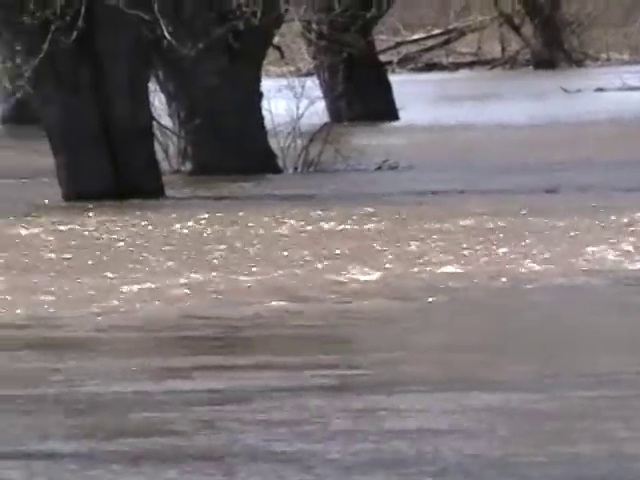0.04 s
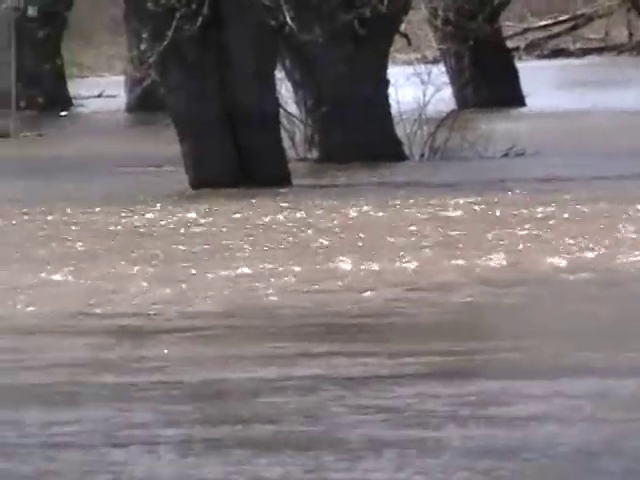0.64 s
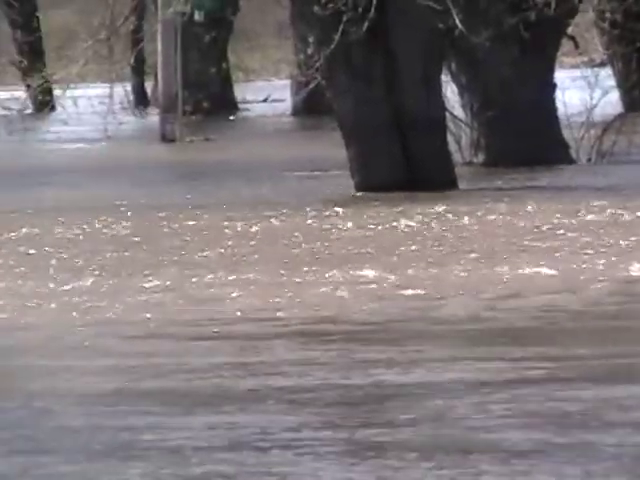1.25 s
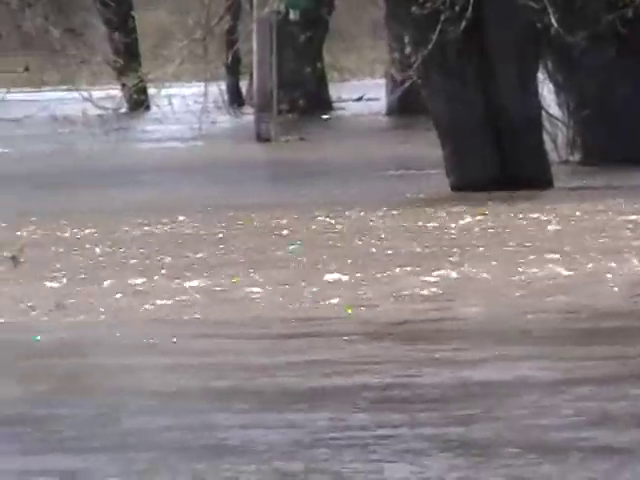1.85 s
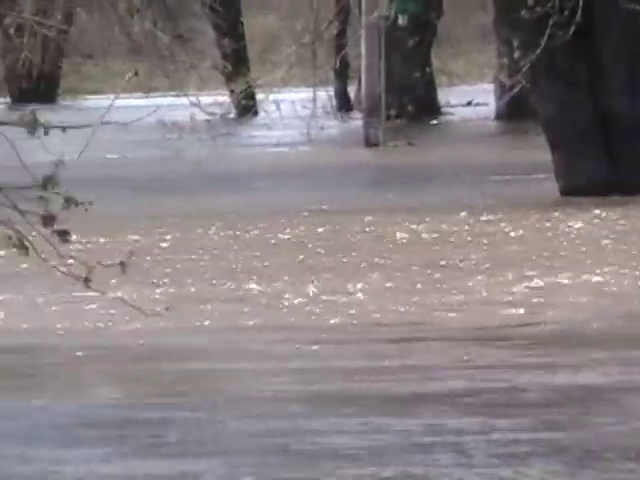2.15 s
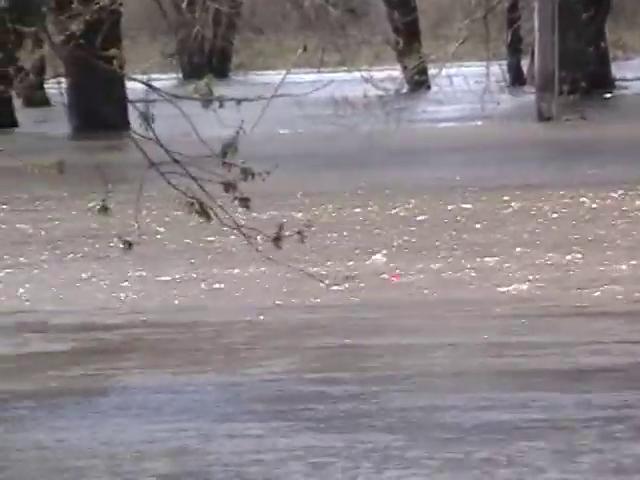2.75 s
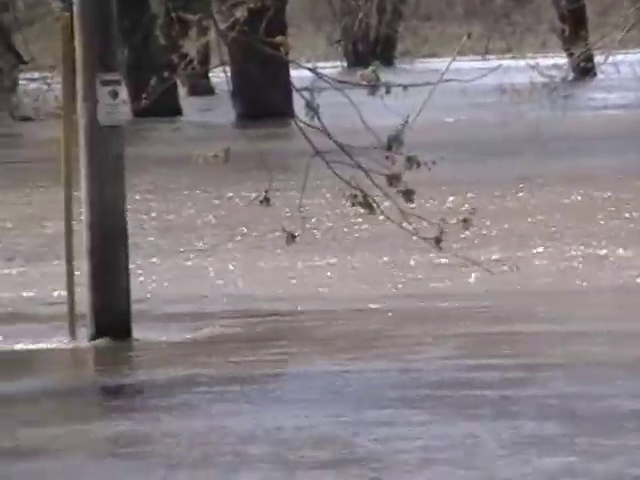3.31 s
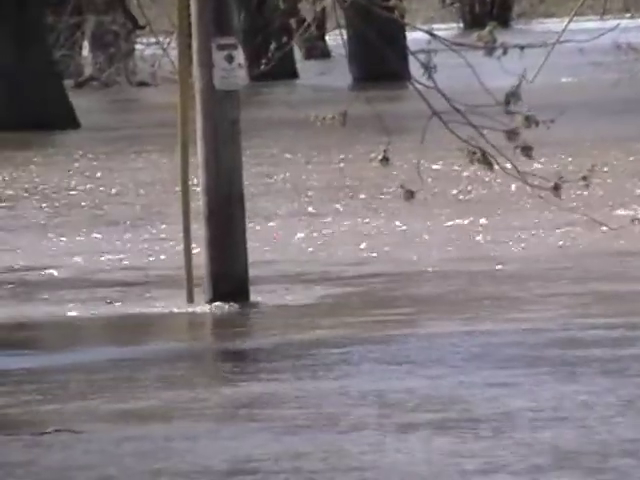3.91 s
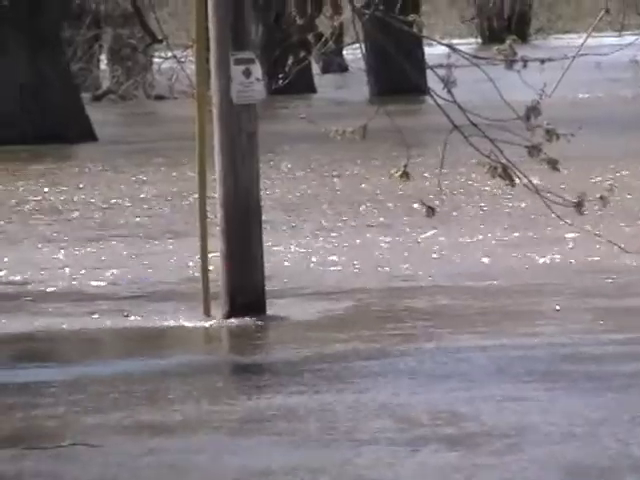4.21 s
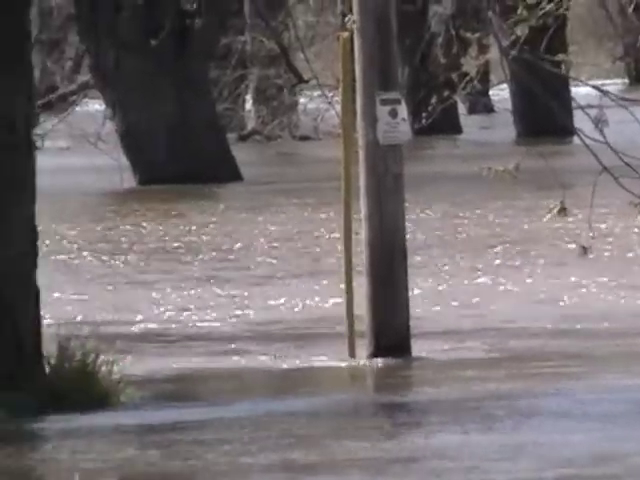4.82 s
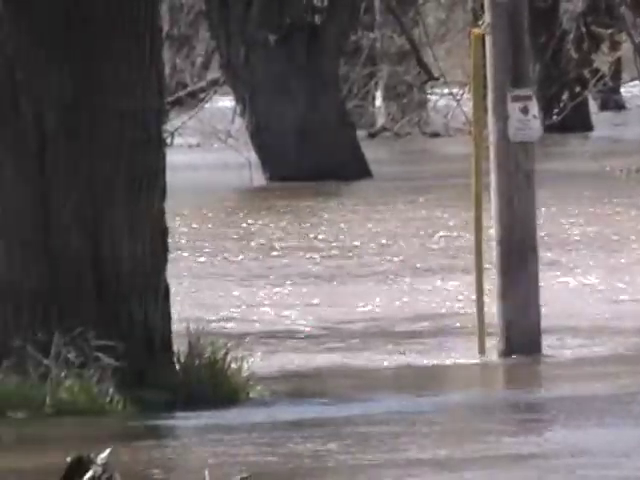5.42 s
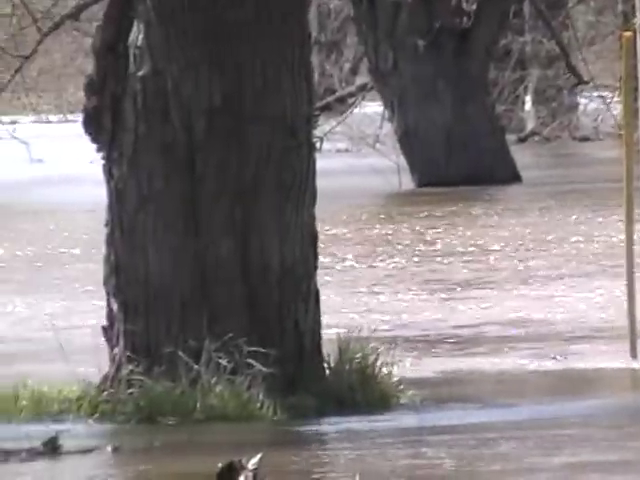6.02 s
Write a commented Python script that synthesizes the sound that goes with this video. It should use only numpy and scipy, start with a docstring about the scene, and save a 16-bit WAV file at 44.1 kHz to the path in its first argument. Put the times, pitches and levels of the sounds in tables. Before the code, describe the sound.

Floodwater rushes steadily beside a wood for the whole six seconds, with a very faint, thin camera whine underneath. From the start, gusts buffet the microphone with a loud low rumble, thumps and tiny ticks, hardest around 0.4 to 0.7 seconds. At about 0.9 seconds a woodpecker begins a fast vocal trill of short, arched notes, roughly nine a second. It starts soft and reedy, swells by 1.7 seconds, then turns slightly hoarse and stops near 3.6 seconds, echoing among the trunks. The wind gradually eases, with weaker gusts around 3 to 3.5 and 4.5 to 5 seconds. Faint sparrow chirps come at about 2.5, 3.7, 4.5, 5.1 and 5.7 seconds. Farther off, a thin high trill starts near 3.9 seconds and a run of dry chips near 4.8, both lasting to the end. One small dry snap sounds close by at 5.5 seconds.

```python
"""Beside a flooded wood, on a faintly whining camera's microphone, the river rushing steadily throughout.
Gusts buffet the microphone from the start, thumping and ticking. Just under a second in, a woodpecker
begins a fast trill of arched notes, echoed by the trunks, and holds it for nearly three seconds.
Then, as the wind eases, sparrows and other small birds chirp and trill farther off among the trees,
and near the end there is one dry snap close by."""
import sys
import numpy as np
from scipy import signal
from scipy.fft import rfft, irfft, next_fast_len
from scipy.io import wavfile
from scipy.ndimage import uniform_filter1d, minimum_filter1d, map_coordinates

SR = 44100
rng = np.random.default_rng(int(sys.argv[2]) if len(sys.argv) > 2 else 0)


def unload_wav(signal):
    """Save mono or channel-first audio to the path in sys.argv[1] as 16-bit WAV at rate SR, clipped to [-1, 1]."""
    wavfile.write(
        sys.argv[1],
        SR,
        np.round(np.clip(np.atleast_2d(signal).T, -1, 1) * 32767).astype(np.int16),
    )


N = 271656

# Fine turbulence at the microphone. Each row: frequency in Hz, relative level in dB.
TURBULENCE = [(170, -24.5), (310, 9), (500, 1.5), (900, -11), (1600, -16.5), (2600, -27), (3600, -36.5),
              (5000, -52.5), (9000, -66), (15000, -70)]


def woodpecker(echo_db=-11.5, leaves_db=-6):
    """The main voice: each note arches up and down in pitch, and the throat favours its second harmonic."""
    # Resonances of throat and bill. Each row: frequency in Hz, gain in dB.
    throat = [(1300, -30), (2300, 6.5), (2650, -14.5), (2850, 1.5), (3050, -1), (3900, -22.5),
              (4450, -25.5), (5300, -28), (5900, -27.5), (6600, -22), (7400, -32.5), (8300, -29),
              (8850, -31), (9400, -38.5), (11000, -49)]
    song = np.zeros(N)
    t = np.arange(-SR // 36, SR // 36) / SR
    harmonics = np.arange(1, 9)[:, None]
    flank = (t / .018) ** 2  # 0 at the crest, 1 at 18 ms to either side
    swell = np.exp(-flank ** 4)
    arch = 1 - .125 * flank - .07 * flank ** 2
    for s, crest_hz, db, overtones_db, rough in trill_notes():
        # the voice is cleanest at the crest and rasps as it starts and stops
        quiver = rough * (.5 + 2 * flank) * unit(uniform_filter1d(rng.standard_normal(len(t)), size=30))
        phase = 2 * np.pi * np.cumsum(crest_hz * (arch + quiver)) / SR
        # the upper overtones come out a little differently in every note
        colour_db = (harmonics > 2) * (overtones_db + rng.normal(0, 2.0, harmonics.shape))
        partials = amp(along(throat, harmonics * crest_hz * arch) + colour_db) * np.sin(harmonics * phase)
        add(song, s + t[0], np.sqrt(2) * amp(db) * swell * partials.sum(axis=0))
    # twigs and leaves dull the straight path; the echo keeps its overtones
    direct = filtered(song, lambda hz: amp(along([(3200, 0), (7000, leaves_db)], hz)))
    direct = off_water(direct, null_hz=2985, mirror=.84, order=4)
    return direct + amp(echo_db) * echo(song)


def trill_notes(start_s=0.8755, count=25):
    """The woodpecker's notes: low, soft and reedy at first, they swell, then ease and grow hoarse."""
    # Each row: time in seconds, crest pitch in Hz, relative level in dB, upper overtone gain in dB,
    # roughness as a fraction of the pitch.
    voice = [(.88, 1308, -40, 3, .005), (1.23, 1363, -37, 1.5, .006), (1.45, 1453, -30.5, 0.5, 0.0073),
             (1.69, 1468, -27.5, 0, .008), (2.05, 1489, -31, -1, 0.013), (3.62, 1492, -33, -1, 0.014)]
    # The pace picks up, holds and falters once. Each row: time in seconds, seconds to the next note.
    pace = [(.88, .125), (1.05, .117), (1.75, .1123), (3.02, .1126), (3.16, .122), (3.52, .111)]
    notes, s = [], start_s
    for _ in range(count):
        notes.append((s, *curves(voice, s)))
        s += curves(pace, s)[0]
    return notes


def wind(rumble_db=-1.17, strong_db=-15, flutter_db=-24.5, growth=1.37, burst_floor=.3):
    """Gusts rumble on the microphone; the strong ones break into brighter, lumpy flutter."""
    # The large eddies. Each row: frequency in Hz, relative level in dB.
    buffet = [(20, -30), (40, -13), (68, 0), (120, 1), (200, -2.5), (300, -9), (420, -28.5), (600, -33),
              (1100, -93)]
    gust_db = wind_strength()
    eddies = noise(buffet)
    # eddies follow one another closely, so the gust alone sets the slow level
    eddies = eddies / np.sqrt(np.abs(uniform_filter1d(eddies ** 2, size=1500)) + 1e-6)
    rumble = amp(gust_db + rumble_db) * eddies
    # fine turbulence tears off at the peaks of the large eddies
    bursts = unit(burst_floor + uniform_filter1d(eddies ** 2, size=120))
    flutter = amp(flutter_db + growth * (gust_db - strong_db)) * bursts * noise(TURBULENCE)
    return rumble + flutter


def wind_strength(rise_db_per_s=792, fall_db_per_s=489, unrest_db=1.87, unrest_hz=24):
    """Level in dB of the breeze and its gusts together, never quite steady."""
    # The air between gusts. Each row: time in seconds, relative level in dB.
    breeze = [(0, -15), (.26, -31), (.71, -16.5), (.9, -23), (1.07, -23), (1.75, -25), (2.18, -34.5),
              (2.58, -31.5), (2.84, -37.5), (3.5, -29), (3.96, -29.5), (4.17, -31.5), (4.8, -40),
              (5.19, -28.8), (5.5, -44.5), (6.16, -51)]
    # Gusts swell, hold and drop away. Each row: start of the hold and its length in seconds, level in dB.
    gusts = [(0.01, 0.042, -15.5), (0.137, 0.033, -13.5), (.272, .13, -15.5), (0.443, 0.245, -11.5),
             (1.136, .04, -21.5), (1.23, .15, -18.5), (1.459, 0.07, -20), (1.832, .17, -25),
             (2.108, 0.041, -26), (2.308, .24, -31.5), (2.969, .054, -24), (3.079, 0.12, -22.5),
             (3.28, 0.076, -27), (3.443, 0.024, -25), (3.647, 0.168, -32), (4.33, .13, -30.5),
             (4.522, 0.17, -26.5), (4.732, .04, -28), (4.823, 0.041, -26.5), (4.939, .186, -27)]
    t = np.arange(N) / SR
    power = amp(curves(breeze, t)[0]) ** 2
    for s, hold, db in gusts:
        below_db = rise_db_per_s * np.maximum(s - t, 0) + fall_db_per_s * np.maximum(t - s - hold, 0)
        power += amp(db - np.minimum(below_db, 100)) ** 2
    return 10 * np.log10(power) + unrest_db * wobble(unrest_hz)


def thumps(level_db=-5, width_s=0.00097, puff_db=-21):
    """A passing eddy pushes, then pulls the diaphragm, with a puff of turbulence."""
    # The strongest single eddies. Each row: time in seconds, relative peak in dB.
    eddies = [(0.153, -8), (0.285, -8), (0.393, -1.5), (0.508, -0.5), (0.569, -6.5), (0.638, -2),
              (0.695, -6), (0.83, -7.5), (1.058, -8.5), (1.242, -8), (3.007, -7.5), (3.069, -7.5),
              (3.234, -5), (3.375, -10), (3.438, -7.5), (4.632, -13)]
    push, puff = np.zeros(N), np.zeros(N)
    t = np.arange(-SR // 100, SR // 50) / SR
    for s, db in eddies:
        passage = t / (width_s * np.exp(rng.normal(0, 0.083))) - 3
        bell = amp(db) * np.exp((1 - passage ** 2) / 2)
        add(push, s + t[0], passage * bell)
        add(puff, s + t[0], bell)
    return amp(level_db) * push + amp(puff_db) * puff * noise(TURBULENCE)


def ticks(level_db=-1, t60=0.0039):
    """Tiny broadband ticks right at the microphone, most of them in the hardest gust."""
    # Each row: start in seconds, relative level in dB.
    hits = [(0.301, -38), (0.5107, -41.5), (0.5656, -39.5), (0.6078, -38.5), (0.6428, -33.5),
            (0.6766, -40.5), (0.7, -40.5), (1.351, -46)]
    track = np.zeros(N)
    t = np.arange(SR // 50) / SR
    for s, db in hits:
        add(track, s, amp(db + level_db - 60 * t / t60) * rng.standard_normal(len(t)))
    return track


def sparrow(level_db=-3):
    """Slightly hoarse two-voiced chirps from among the trees, each gesture at its own strength."""
    # Each row: start in seconds, relative level in dB, duration ratio.
    chirps = [(2.524, -47, 1.05), (3.721, -46, 1.12), (4.506, -44.5, 1.04), (5.122, -40, 1),
              (5.686, -47, 1.15)]
    # One chirp from both sides of the syrinx, a list for each gesture.
    # Each row: seconds from the chirp's start, pitch in Hz, relative level in dB.
    gestures = [
        [(-.008, 3760, -2), (.008, 4500, -6), (.021, 5150, -1.5), (.036, 4600, -10.5), (.051, 3800, -2),
         (.062, 4770, -14.5), (.072, 5300, -10.5), (.088, 4240, -7)],
        [(.003, 4700, -7), (.014, 5355, -3.5), (.026, 5630, -2.5), (.04, 5050, -19.5), (.052, 4300, -5.5),
         (.06, 5410, -20), (.069, 5850, -5), (.082, 5180, 0)],
        [(.11, 3310, -10), (.126, 4125, -2.5), (.141, 4620, -11)],
        [(-.028, 7500, -23), (-.018, 7140, -20.5), (-.008, 6600, -33)],
    ]
    song = np.zeros(N)
    for s, db, stretch in chirps:
        for gesture in gestures:
            add_whistle(song, gesture, s, db + rng.normal(0, 1.5), stretch, rough=.015)
    return amp(level_db) * (song + amp(-6) * near_trunks(song) + amp(-2) * echo(song))


def far_birds(direct_db=-2, echo_db=-5, chip_db=-53.5):
    """Slurs, dry chips and a thin, even trill from deeper in the wood."""
    # Each row: start and length in seconds, first and last pitch in Hz, relative level in dB.
    slurs = [(.064, 0.045, 4550, 2970, -53.5), (.203, 0.02, 3840, 3130, -55), (.332, .028, 3940, 2970, -60),
             (3.095, .055, 4750, 5600, -58.5), (3.152, .038, 3100, 4250, -45.5),
             (3.19, .044, 4300, 3430, -50), (4.008, 0.0344, 3080, 2360, -55),
             (4.148, .022, 3250, 3450, -56), (5.905, 0.076, 4430, 2450, -59)]
    # One chip and one rising trill note. Each row: seconds from its middle, pitch in Hz, gain in dB.
    chip_note = [(-.008, 4500, -3.5), (-.002, 4830, -1), (.001, 5330, 2.5), (.004, 4860, -12),
                 (.008, 4340, -12)]
    thin_note = [(-.012, 5420, -8), (-.003, 5950, 8.5), (.005, 6180, 1), (.012, 6100, -33)]
    # The thin trill swells and fades. Each row: time in seconds, relative level in dB.
    thin_swell = [(3.9, -74), (4.1, -64.5), (4.8, -64), (6.15, -72)]
    song = np.zeros(N)
    for s, length, first_hz, last_hz, db in slurs:
        add_whistle(song, [(0, first_hz, 0), (length, last_hz, 0)], s, db, rough=.035)
    for s in chip_times():
        add_whistle(song, chip_note, s, chip_db + rng.normal(0, 2.8), rough=0.022)
    for s in np.arange(3.906, 6.15, .0588):
        add_whistle(song, thin_note, s, curves(thin_swell, s)[0], rough=0.0024)
    return amp(direct_db) * song + amp(echo_db) * echo(song)


def chip_times(start_s=4.797, gap_s=.0677, slowing_s=.00045, count=19):
    """The times of a small bird's run of chips, each gap a little longer than the one before."""
    k = np.arange(count)
    return start_s + gap_s * k + slowing_s * k * (k - 1) / 2


def add_whistle(track, gesture, s=0, db=0, stretch=1, rough=.01):
    """A syrinx sings a gliding, slightly hoarse tone along points of seconds, Hz and dB."""
    when, hz, level = np.transpose(gesture)
    when = when * stretch
    t = np.arange(when.min(), when.max(), 1 / SR)
    quiver = unit(uniform_filter1d(rng.standard_normal(len(t)), size=40))
    pitch = uniform_filter1d(np.interp(t, when, hz), size=200, mode="nearest") * (1 + rough * quiver)
    swell = amp(db + np.interp(t, when, level)) * signal.windows.tukey(len(t), .2)
    add(track, s + when[0], np.sqrt(2) * swell * np.sin(2 * np.pi * np.cumsum(pitch) / SR))


def snap(start_s=5.488, level_db=-45.5, t60=0.034):
    """One small, dry crack near the microphone: bright noise that dies at once."""
    # Each row: frequency in Hz, relative level in dB.
    colour = [(1500, -25.5), (3000, 10), (5000, 2), (8300, 5), (10000, -25), (15000, -39)]
    age = np.arange(N) / SR - start_s
    return (age > 0) * amp(level_db - 60 * np.abs(age) / t60) * noise(colour)


def river(level_db=-38.5, patchy_db=0.5):
    """The broad rush of the flood, its colour shifting in patches."""
    # Each row: frequency in Hz, relative level in dB.
    rush = [(40, -21.5), (80, 1.5), (135, 11.5), (300, 2.5), (550, 3.5), (1000, 2.5), (1500, -6.5),
            (2100, -18), (3000, -18.5), (4300, -24.5), (6000, -31.5), (8000, -38), (9800, -44),
            (15500, -44)]
    bands = signal.stft(noise(rush), nperseg=512)[2]
    patches = uniform_filter1d(rng.standard_normal(bands.shape), size=5, axis=0)  # across frequency
    patches = unit(uniform_filter1d(patches, size=14, axis=1))  # across time
    water = signal.istft(bands * amp(patchy_db * patches), nperseg=512)[1][:N]
    return amp(level_db) * unit(water)


def camera(whine_hz=5204, whine_db=-73, whirr_db=-65, whirr_s=.16):
    """The camera's steady thin whine, and the brief whirr of its lens motor at the start."""
    pitch = whine_hz + 4 * wobble(30)
    whine = np.sqrt(2) * amp(whine_db) * np.sin(2 * np.pi * np.cumsum(pitch) / SR)
    # The motor through the casing. Each row: frequency in Hz, relative level in dB.
    casing = [(3000, -18), (5200, 8), (6400, -36), (7200, 9.5),
              (8000, -3), (11500, -5.5), (12300, -5), (13200, -17.0)]
    running = np.arange(N) / SR < whirr_s
    return whine + amp(whirr_db) * noise(casing) * running


def echo(x, build_s=0.02):
    """Scatter from the trunks: it builds up, then dies soonest in the middle treble."""
    # Each row: frequency in Hz, seconds to fall by 60 dB.
    wood = [(1500, 1), (3000, 0.85), (5500, 0.77), (10000, 1)]
    hz, t, bands = signal.stft(rng.standard_normal(SR), SR, nperseg=256)
    decay = amp(-60 * t / along(wood, hz)[:, None])
    onset = 1 - np.exp(-t / build_s)
    tail = signal.istft(bands * decay * onset, SR, nperseg=256)[1]
    return signal.fftconvolve(x, tail / np.linalg.norm(tail))[:N]


def near_trunks(x, count=8):
    """A few single bounces within 25 ms, which break a glide into brighter and duller patches."""
    taps = np.zeros(SR // 40)
    taps[rng.integers(SR // 500, len(taps), count)] = rng.choice([-1, 1], count) / np.sqrt(count)
    return signal.fftconvolve(x, taps)[:N]


def off_water(x, null_hz, mirror, order):
    """The bounce off the water arrives order + 1/2 cycles of null_hz late and nearly cancels that pitch."""
    delay = (order + .5) / null_hz
    return filtered(x, lambda hz: (1 + mirror * np.exp(-2j * np.pi * hz * delay)) / (1 + mirror))


def limiter(x, ceiling_db=-2.5, size=2600):
    """The camera turns the level down for a moment around each peak that would pass the ceiling."""
    needed = np.minimum(amp(ceiling_db) / (np.abs(x).max(axis=0) + 1e-9), 1)
    return x * uniform_filter1d(minimum_filter1d(needed, size=size), size=size // 2)


def amp(db):
    """Decibels to gain."""
    return 10 ** (np.asarray(db) / 20)


def unit(x):
    """x at rms 1."""
    return x / np.sqrt(np.mean(x ** 2) + 1e-20)


def along(points, hz):
    """Rows of frequency and value, read at hz on a log axis."""
    f, v = np.transpose(points)
    return np.interp(np.log(hz + 1), np.log(f), v)


def curves(rows, s):
    """Rows that begin with a time: each further column, read at the times s."""
    when, *columns = np.transpose(rows)
    return [np.interp(s, when, column) for column in columns]


def wobble(rate):
    """A smooth random curve, rate knots a second."""
    return map_coordinates(rng.standard_normal(int(N * rate / SR) + 4), [np.arange(N) * rate / SR])


def filtered(x, response):
    """x through a gain that depends on frequency."""
    size = next_fast_len(N + SR // 2)
    return irfft(rfft(x, size) * response(np.fft.rfftfreq(size, 1 / SR)), size)[..., :N]


def noise(spectrum):
    """Coloured noise of rms 1."""
    return unit(filtered(rng.standard_normal(N), lambda hz: amp(along(spectrum, hz))))


def add(track, s, sound):
    """Mix a sound into the track at time s."""
    start = max(round(s * SR), 0)
    span = track[start:start + len(sound)]
    span += sound[:len(span)]


def scene():
    """Birds, water and wind at one spot beside the wood, alike in both channels."""
    birds = woodpecker() + sparrow() + far_birds()
    mono = birds + snap() + river() + wind() + thumps() + ticks() + camera()
    return np.array([mono, mono])


def record(dry):
    """The sound fades in over its first few milliseconds; the camera limits the hardest buffets and keeps
    nothing above its band limit."""
    fade_s, top_hz = .004, 15800
    fade = np.minimum(np.arange(N) / SR / fade_s, 1)
    return filtered(limiter(dry * fade), lambda hz: hz < top_hz)


dry = scene()
out = record(dry)
unload_wav(out)
```